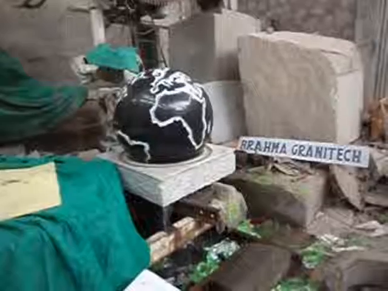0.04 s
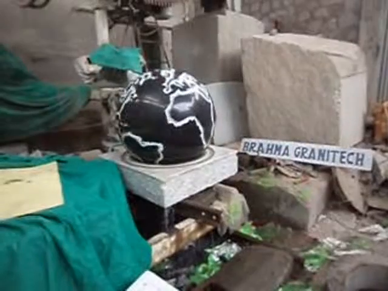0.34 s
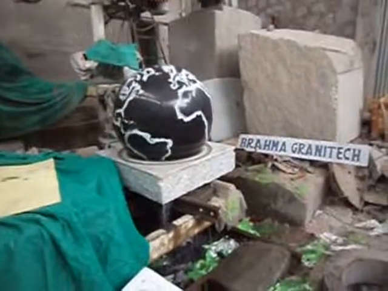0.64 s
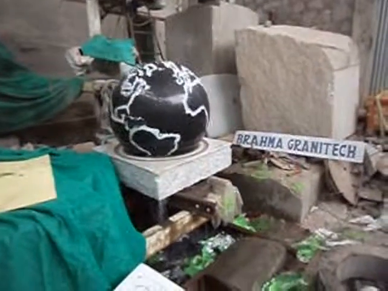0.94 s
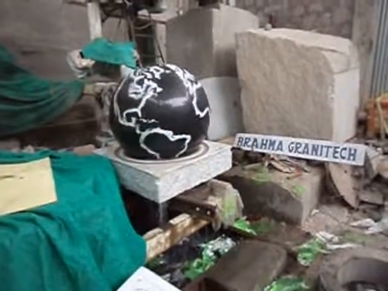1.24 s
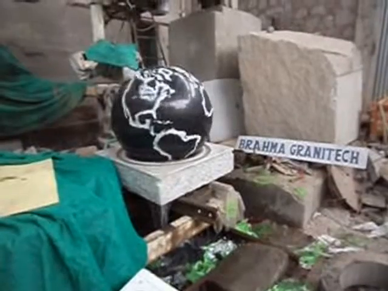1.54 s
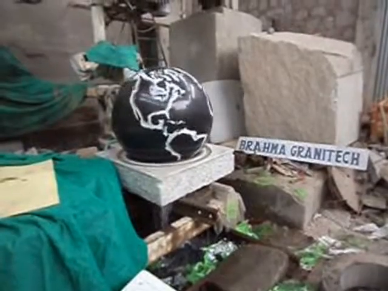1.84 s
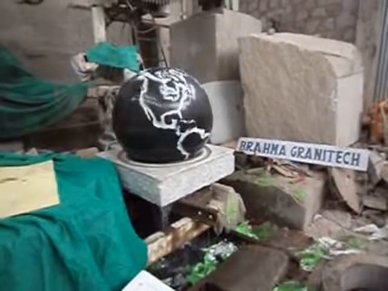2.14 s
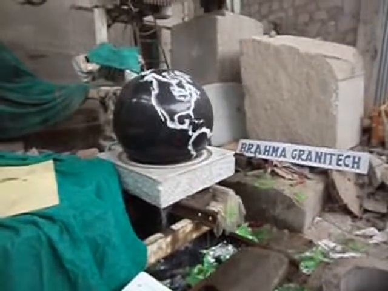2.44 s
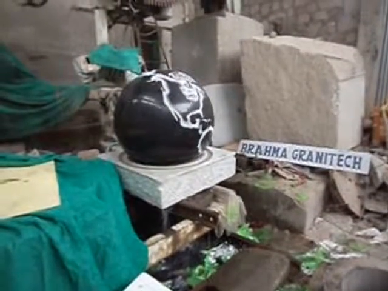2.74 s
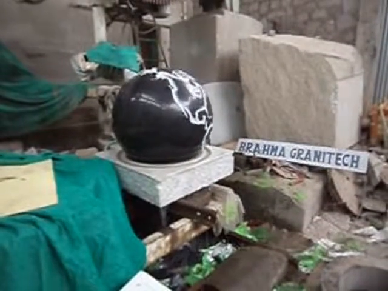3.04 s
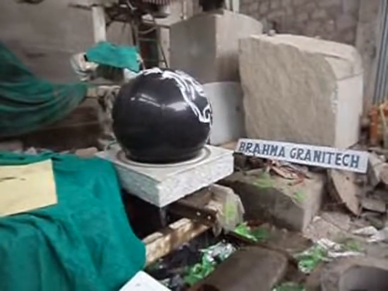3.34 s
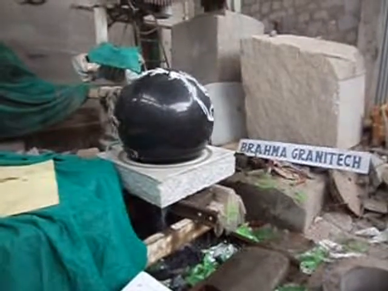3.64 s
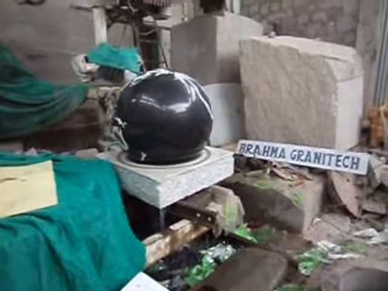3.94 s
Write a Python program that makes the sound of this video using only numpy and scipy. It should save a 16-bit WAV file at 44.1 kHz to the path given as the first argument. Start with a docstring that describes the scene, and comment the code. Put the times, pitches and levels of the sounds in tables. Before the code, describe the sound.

A water pump fades in over two seconds, then hums and whirrs steadily in an outdoor yard. A thin stream from a stone ball fountain spatters into a pit, with a few drops ticking near the end.

```python
"""A pump drives water under a turning stone ball in a stonecutter's yard.
Its motor hums on the mains, the flow shakes its casing into a drone and a whirr, and a rush lies beneath.
A thin stream splashes from the plinth into a pit: fine spatter, ringing bubbles, a few ticking drops.
The sound fades in over two seconds, with one soft electrical thump on the way."""
import sys
import numpy as np
from scipy import signal
from scipy.fft import rfft, irfft
from scipy.io import wavfile
from scipy.ndimage import uniform_filter1d

SR = 44100
rng = np.random.default_rng(int(sys.argv[2]) if len(sys.argv) > 2 else 0)


def digitize_waveform(pressure):
    """Quantize a signal to 16-bit integers and store it at the path in sys.argv[1].

    Rows of a 2-D input are taken as channels; values are limited to [-1, 1].
    """
    field = np.atleast_2d(pressure).T
    bounded = np.clip(field, -1, 1)
    quanta = np.round(bounded * 32767).astype(np.int16)
    wavfile.write(sys.argv[1], SR, quanta)


N = 176400
TIME = np.arange(N) / SR
FREQS = np.fft.rfftfreq(N, 1 / SR)

# tone colour of splashing water: f/Hz, relative level/dB
SPLASH_EQ = [(500, -8.5), (1500, -7.5), (3000, 0.5), (4200, -5), (5150, -3), (5500, -14.5), (6000, -13),
             (6500, -24), (7100, -49.5)]


def gain_of(db):
    """Decibels to gain."""
    return 10 ** (np.asarray(db) / 20)


def unit_rms(x):
    """Scales to an rms of one."""
    return x / np.sqrt(np.mean(x ** 2) + 1e-20)


def fader(points):
    """Gain riding along a curve of t/s, level/dB."""
    return gain_of(np.interp(TIME, *np.transpose(points)))


def equalise(x, points):
    """Shapes a sound with a curve of f/Hz, level/dB, joined on a log-frequency axis."""
    hz, db = np.transpose(points)
    response_db = np.interp(np.log(FREQS + 1), np.log(hz), db)
    return irfft(rfft(x) * gain_of(response_db), N)


def drift(rate_hz):
    """Random wandering up to about the given rate, at an rms of one."""
    spectrum = rfft(rng.standard_normal(N)) * (FREQS > 0)
    return unit_rms(irfft(spectrum / (1 + (FREQS / rate_hz) ** 4), N))


def resonance(hz, width_hz):
    """Turbulence heard through one steep-sided resonance."""
    detune = (FREQS - hz) / width_hz
    return unit_rms(irfft(rfft(rng.standard_normal(N)) / (1 + detune ** 2) ** 2, N))


def tone(hz, waver_hz, waver_db, rate_hz):
    """A sine that wavers in pitch and level."""
    cycles = np.cumsum(hz + waver_hz * drift(rate_hz)) / SR + rng.random()
    return unit_rms(np.sin(2 * np.pi * cycles) * gain_of(waver_db * drift(rate_hz)))


def motor(hum_hz=100.8):
    """Hum on harmonics of twice the mains frequency, and the less steady whine of shaft and impeller."""
    # mains hum: multiple of hum_hz, level/dB
    harmonics = [(3, -38.5), (4, -46.5), (5, -42), (6, -45.5), (20, -49), (21, -48.5), (26, -51)]
    # swell of the strongest harmonic: t/s, level/dB
    hum_swell = [(0.3, 5), (0.8, -3.5), (1.1, 0.5), (1.55, 5.5), (1.9, -2.5), (2.25, 4.5), (2.52, 5),
                 (2.75, -4), (2.98, 1.5), (3.1, 5), (3.3, 7), (3.5, -5.5), (4.0, -5.5)]
    # tones of the turning parts: f/Hz, level/dB
    whine_tones = [(181, -50), (250.3, -47.5), (264, -47), (324.3, -41), (427, -46), (650.5, -47.5),
                   (793, -45.5), (936.5, -48.5), (1082, -53.5), (1108, -53), (1202, -51.5), (2702, -54)]
    hum = [gain_of(db) * tone(k * hum_hz, waver_hz=0.71, waver_db=2.1, rate_hz=9) for k, db in harmonics]
    whine = sum(gain_of(db) * tone(hz, waver_hz=2.23, waver_db=2.5, rate_hz=6.16)
                for hz, db in whine_tones)
    return hum[0] * fader(hum_swell) + sum(hum[1:]) + whine


def casing():
    """The flow shakes the casing: a steady body, a swelling drone with a tone at its core, a whirr."""
    # resonances of body, drone and whirr: f/Hz, width/Hz, level/dB
    body_modes = [(250, 27, -41), (467, 38, -41), (698, 36, -46.5), (1000, 40, -46), (1360, 180, -42),
                  (3270, 150, -47.5), (4150, 130, -46), (5100, 210, -48), (5880, 110, -64)]
    drone_modes = [(857, 38, -40), (942, 50, -41)]
    whirr_modes = [(2003, 70, -47.5), (2137, 85, -44.5), (2210, 60, -53.5)]
    # swells of drone and whirr: t/s, level/dB
    drone_swell = [(0.4, -1), (0.59, 5), (0.82, -1), (0.93, 4), (1.05, 5.5), (1.17, -6), (1.47, 4),
                   (1.58, -6), (1.93, 3), (2.05, -3), (2.3, -2.5), (2.47, 4.5), (2.63, -3), (2.75, 5),
                   (2.83, -3), (3.28, -2), (3.47, 6.5), (3.56, -1), (3.88, 3.5), (4.0, -6)]
    whirr_swell = [(0.6, -5), (1.2, 6), (1.9, 1.5), (2.5, 5), (2.9, 6.5), (3.1, -8.5), (4.0, 0)]
    body, drone, whirr = [sum(gain_of(db) * resonance(hz, width) for hz, width, db in modes)
                          for modes in (body_modes, drone_modes, whirr_modes)]
    core = gain_of(-39.5) * tone(883, waver_hz=1.8, waver_db=2.0, rate_hz=7)
    return body + (drone + core) * fader(drone_swell) + whirr * fader(whirr_swell)


def wash(level_db=-27, patchy_db=0.8, flicker_db=0.1):
    """Machinery and water blur into a steady rush with small drifting patches in its spectrum."""
    # tone colour of the rush: f/Hz, relative level/dB
    wash_eq = [(20, -1.5), (60, -4), (150, -3.5), (230, 1), (370, 0.5), (520, 1.5), (760, 1), (1100, -1),
               (1650, -4.5), (2600, -5), (4100, -5.5), (4600, -7), (5200, -8), (5480, -14), (6000, -15),
               (6500, -35), (7100, -47)]
    frames, bins = N // 128 + 5, 257
    real, imag, patches = rng.standard_normal((3, frames, bins))
    patches = uniform_filter1d(patches, size=14, axis=0)  # smear in time
    patches = unit_rms(uniform_filter1d(patches, size=7, axis=1))  # and in frequency
    spectra = (real + 1j * imag) * gain_of(patchy_db * patches)
    rush = signal.istft(spectra.T, nperseg=512, noverlap=384)[1][:N]
    return gain_of(level_db - flicker_db * drift(25)) * unit_rms(equalise(rush, wash_eq))


def swell_low_mids(rush, centre_hz=660, width_hz=260):
    """The low midrange of the rush slowly swells and sinks."""
    # boost and cut of the band: t/s, level/dB
    mid_swell = [(0.35, 3), (0.8, -1), (0.95, 3), (1.2, -0.5), (1.4, 3), (1.72, -1.5), (2.0, 0.5),
                 (2.15, -3.5), (2.45, 1.5), (2.95, 1), (3.3, 0.5), (3.7, 2), (4.0, 0.5)]
    mids = irfft(rfft(rush) / (1 + ((FREQS - centre_hz) / width_hz) ** 4), N)
    return rush + mids * (fader(mid_swell) - 1)


def impacts(per_s, spread_db=4.5):
    """Random impacts, most small and a few larger."""
    size = gain_of(spread_db * np.minimum(rng.exponential(1, N), 3.6))
    return size * rng.choice([-1, 1], N) * (rng.random(N) < per_s / SR)


def pit(x, t60_s=0.07, wet_db=-3):
    """The stone pit adds a short reverb tail."""
    t = TIME[:8192]
    tail = rng.standard_normal(len(t)) * 1000 ** (-t / t60_s)
    return x + gain_of(wet_db) * signal.fftconvolve(x, tail / np.linalg.norm(tail))[:N]


def stream(drops_per_s=900, bubbles_per_s=120, burst_s=0.00049, ring_cycles=10, surge_db=2.3):
    """The stream falls unevenly, spatters and traps small bubbles that ring and rise in pitch."""
    t = TIME[:2048]
    drops, bubbles = np.zeros((2, N))
    pitches_hz = np.geomspace(1100, 5000, num=24)
    for hz in pitches_hz:
        burst = rng.standard_normal(len(t)) * np.exp(-t / burst_s)
        drops += signal.oaconvolve(impacts(drops_per_s / len(pitches_hz)), burst)[:N]
        age = t * hz / ring_cycles  # in decay times
        rising_hz = hz * (1 + 0.034 * age)
        ping = np.sin(2 * np.pi * np.cumsum(rising_hz) / SR) * np.exp(-age)
        bubbles += signal.oaconvolve(impacts(bubbles_per_s / len(pitches_hz)), ping)[:N]
    spatter = gain_of(-36.5) * unit_rms(equalise(pit(drops), SPLASH_EQ))
    bubbling = gain_of(-46.5) * unit_rms(equalise(pit(bubbles), SPLASH_EQ))
    return (spatter + bubbling) * gain_of(surge_db * drift(rate_hz=35))


def thump(at_s=1.64, size=0.05, rise_s=0.00036, decay_s=0.62):
    """A voltage step thumps softly and leaks away."""
    age = np.maximum(TIME - at_s, 0)
    return size * (1 - np.exp(-age / rise_s)) * np.exp(-age / decay_s)


def drop_ticks(decay_s=0.0018, width_hz=2400):
    """Single large drops tick on the stone."""
    # drop hits: t/s, level before the EQ/dB, f/Hz
    hits = [(2.6026, -23, 4340), (3.236, -19, 3460), (3.3558, -16.5, 4900), (3.4928, -25, 4100),
            (3.671, -19, 3900)]
    ticks = np.zeros(N)
    for at, db, hz in hits:
        envelope = (TIME >= at) * np.exp(-abs(TIME - at) / decay_s)
        ticks += gain_of(db) * envelope * resonance(hz, width_hz)
    return equalise(ticks, SPLASH_EQ)


def splash_rings():
    """Now and then the splash rings briefly in a narrow band."""
    # rings: peak t/s, f/Hz, width/Hz, half-length/s, level/dB
    rings = [(2.993, 3320, 216, 0.066, -34), (3.53, 3420, 218, 0.12, -37.5)]
    return sum(gain_of(db) * np.exp(-((TIME - at) / half_length) ** 2) * resonance(hz, width)
               for at, hz, width, half_length, db in rings)


def scene():
    """Water and pump, mixed in mono."""
    mix = stream() + motor() + casing() + swell_low_mids(wash()) + drop_ticks() + splash_rings()
    return mix[None]


def record(dry, cutoff_hz=7150):
    """Fades the mix in, adds the thump and cuts the top end steeply."""
    # master fade-in: t/s, level/dB
    fade_in = [(0.0, -100), (0.23, -80), (0.26, -58), (0.325, -35.5), (0.8, -27.5), (1.25, -19.5),
               (1.75, -10), (2.3, -0.6), (2.5, 0), (4.0, 0)]
    mix = dry * fader(fade_in) + thump()
    lowpass = signal.firwin(511, cutoff_hz, window=("kaiser", 9), fs=SR)
    return signal.oaconvolve(mix, lowpass[None], "same")


dry = scene()
out = record(dry)
digitize_waveform(out)
```